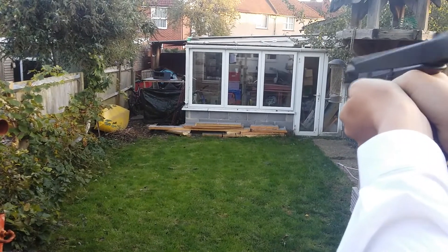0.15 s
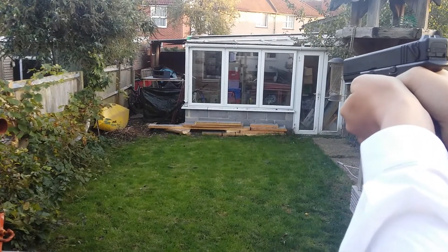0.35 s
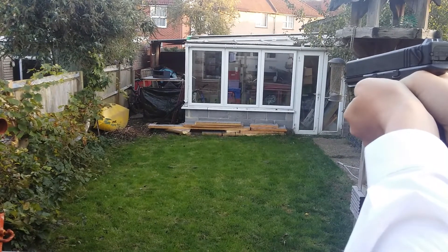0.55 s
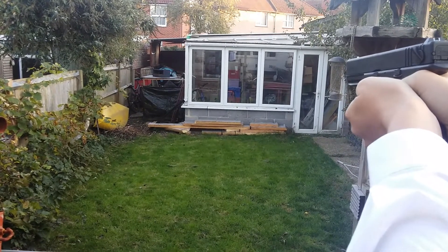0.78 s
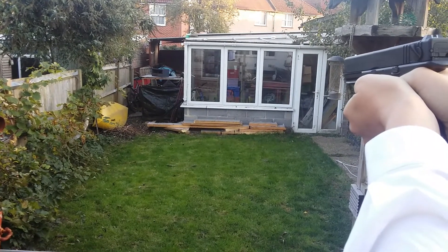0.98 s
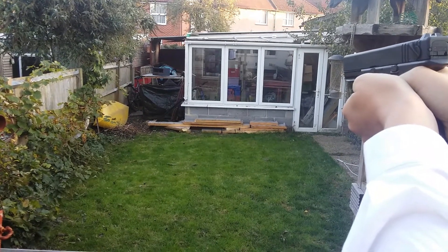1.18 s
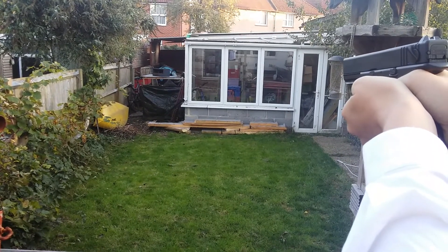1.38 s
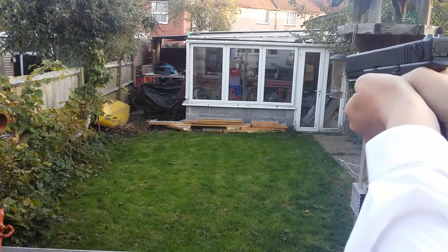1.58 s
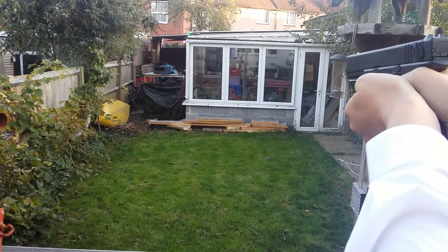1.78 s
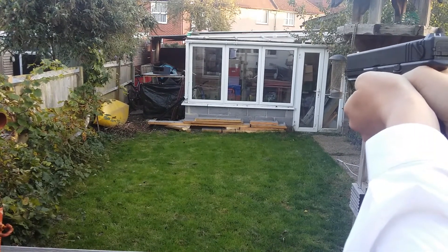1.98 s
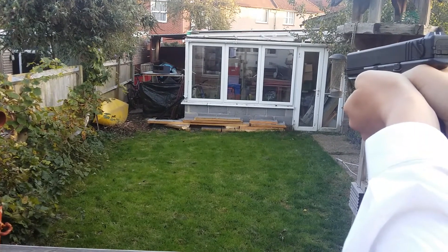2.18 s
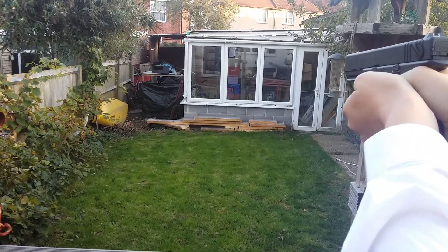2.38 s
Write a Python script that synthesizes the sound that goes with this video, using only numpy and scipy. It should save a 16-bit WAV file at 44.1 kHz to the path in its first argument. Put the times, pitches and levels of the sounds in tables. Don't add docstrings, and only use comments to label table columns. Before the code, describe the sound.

Close, dry pistol snaps with a brief gas hiss and slide rattle come three times, each answered a fifth of a second later by a bright board knock echoing off fences and houses, over very faint distant traffic.

```python
import sys
import numpy as np
from scipy import signal
from scipy.fft import rfft, irfft, next_fast_len
from scipy.io import wavfile
from scipy.ndimage import uniform_filter1d

SR = 44100
rng = np.random.default_rng(int(sys.argv[2]) if len(sys.argv) > 2 else 0)


def ratio_of_db(decibels):
    return 10 ** (np.asarray(decibels, float) / 20)


def persist_wave(psi):
    counts = np.round(np.clip(psi, -1, 1) * 32767).astype(np.int16)
    wavfile.write(sys.argv[1], SR, np.atleast_2d(counts).T)


N = 108045

# t/s, peak level/dB
CRACKS = [
    (.2088, -11.5),
    (1.1268, -10.5),
    (1.9558, -10.5),
]
# t/s, peak level/dB
POPS = [
    (0.2203, -10.3),
    (1.1393, -10.5),
    (1.9697, -12.5),
]
# f/Hz, density/dB per Hz
GAS_COLOUR = [(47, -46.5), (80, -9.5), (493, -2), (1280, -12), (1460, -2), (1900, -11.5), (4830, -12),
              (5520, -23), (16000, -38.5)]
# f/Hz, density/dB per Hz
SNAP_COLOUR = [(300, -29.5), (2000, -7.5), (5000, 2), (7000, -8.5), (16000, -10)]
# f/Hz, density/dB per Hz
RATTLE_COLOUR = [(120, -33), (200, -18), (623, -10), (1480, 2.5), (2020, -8.5), (3250, 5), (4950, -3),
                 (5630, -26), (9000, -25.5), (16000, -35.5)]
# t/s, scrape level/dB, ring f/Hz, ring level/dB, scrape length/s
CLANKS = [(0.231, -23, 4900, -26, 0.0012), (0.2497, -27.5, 2380, -30, .001),
          (0.2525, -27, 4900, -21.5, 0.00075), (0.2553, -33, 2700, -35, .004),
          (0.26, -23.5, 3300, -18.5, 0.0021), (0.2957, -36, 4900, -39.5, 0.0008),
          (.2972, -40.5, 1410, -33, 0.00058), (1.1495, -24.5, 3480, -19.5, 0.0039),
          (1.1726, -28.5, 4170, -30.5, 0.0051), (1.1812, -28.5, 1600, -26, 0.00198),
          (1.1832, -24, 3250, -21, 0.0025), (1.189, -31, 2700, -27, .003),
          (1.206, -35.5, 1624, -30.5, 0.0016), (1.9811, -26.5, 3510, -12.5, 0.0025),
          (1.9914, -35, 3450, -25, 0.0031), (2.0077, -32.5, 2480, -31, 0.0017),
          (2.0175, -34, 1610, -31.5, 0.0074), (2.0121, -27, 5190, -29, 0.0017),
          (2.0181, -25.5, 3200, -30, 0.0051), (2.042, -36, 4710, -35.5, 0.00079),
          (2.0437, -42, 1514, -29, 0.00086)]
# f/Hz, width/Hz, level/dB
SLIDE_MODES = [(1500, 610, -3), (2700, 420, -2.5), (3300, 400, 1), (4900, 1700, -10), (8260, 2200, -17)]
# f/Hz, t60/s
RING_T60 = [(1400, .014), (3250, .02), (3430, .045), (3600, .02), (4900, .013)]
# t/s, level/dB, t60/s, snap level/dB, pitch f/Hz
TICKS = [
    (0.1726, -60, 0.015, -78.5, 2510),
    (0.9861, -64.5, 0.22, -63.5, 1390),
    (1.0928, -58.5, 0.013, -73.5, 2400),
    (1.1005, -66.5, .012, -85.5, 4300),
    (1.928, -60.5, 0.019, -71.5, 2400),
    (1.936, -63, 0.013, -85, 4300),
    (2.407, -63.5, 0.23, -76, 4200),
]
# f/Hz, density/dB per Hz
TICK_COLOUR = [(290, -28.5), (500, 0.5), (3250, -7.5), (4210, -8.5), (6510, -35), (12700, -29),
               (16000, -33.5)]
# t/s, peak level/dB, low board pitch f/Hz, high board pitch f/Hz, contact/ms
IMPACTS = [
    (0.4134, -9, 990, 1560, 0.059),
    (1.3371, -11.5, 1190, 1666, 0.092),
    (2.174, -12.5, 985, 1395, 0.098),
]
# f/Hz, width/Hz, level/dB
BOARD_MODES = [(165.2, 70, -2.5), (2800, 910, 1), (4233, 430, -2), (8000, 6000, -24.5)]
# f/Hz, density/dB per Hz
SHAKE_COLOUR = [(47, -65.5), (80, -35.5), (133, -6.5), (550, -15.5), (734, -3), (1490, 4), (1860, -3.5),
                (4520, -3.5), (16000, -78.5)]
# delay/s, sign, left level/dB, right level/dB
WALLS = [(.0020, -1, -6, -4), (.0056, -1, -9, -10), (.0077, 1, -10, -11), (.0136, 1, -10, -10),
         (.0165, -1, -13, -12), (.0182, 1, -13, -12), (.027, 1, -18, -17)]
# f/Hz, density/dB per Hz
SLIDE_WET = [(120, -31), (600, -12), (1500, -3.5), (3300, -4), (5000, -5.5), (5800, -12.5), (9000, -21.5),
             (16000, -28.5)]
# f/Hz, density/dB per Hz
BOARD_WET = [(60, -32), (160, -5.5), (550, -4.5), (1200, -1), (3400, 0.5), (4900, -7), (6000, -18.5),
             (8500, -21.5), (16000, -43.5)]
# f/Hz, t60/s
GARDEN = [(150, .31), (1000, .26), (4000, .27), (7000, 0.27), (10000, .22), (14000, 0.18)]
# f/Hz, t60/s
STREET = [(200, 1.5), (1500, 0.75), (3500, .8), (5500, 0.38), (12000, 0.35)]
# f/Hz, density/dB per Hz
HUM = [(15, -39), (30, -15.5), (95, -3.5), (250, -8.5), (500, -16), (1000, -21.5), (1500, -29.5),
       (2200, -41.5), (4900, -56), (7000, -50), (16500, -51.5)]
# f/Hz, likeness/1
ALIKE = [(60, 0.67), (240, 0.12), (950, 0.37), (3770, 0.23), (15000, 0.2)]
# t/s, level/dB
SWELL = [(0, -2.5), (.7, -3.5), (1.301, 1), (1.799, -1), (2.45, -1)]
# t/s, level/dB
WHINE = [(1.501, -100), (1.65, -79.5), (1.819, -78), (1.93, -79.5), (2.201, -105)]
# f/Hz, left over right level/dB
PORTS = [(60, -2.5), (300, -3), (700, -.5), (1500, -1.5), (3600, -1), (4900, 15), (6500, 6), (12000, -1)]
# f/Hz, level/dB
MIC = [(15, -13), (40, -1), (80, 0), (15700, 0), (16000, -18), (16800, -24), (17000, -80)]

LEAD_S = .004
VALVE_S, VALVE_DB, VALVE_MS = 0.0024, -15, 0.22
POP_MS, REBOUND, REBOUND_S = 0.33, .45, .0012
LEAK_S = .0045
SNAP_DB, SNAP_T60 = -11.5, .004
RATTLE_DB, FADE_T60, SCRAPE_T60, RING_RISE_S = -2, 0.041, .01, 0.00048
SLIDE_SEND_DB, BOARD_SEND_DB = 20.5, 8.5
TICK_RING, TICK_WIDTH = 0.83, 0.2
BOARD_WIDTH_HZ, LOW_DB, HIGH_DB = 330, -1, 6.5
SHAKE_DB, SHAKE_T60 = -34, 0.029
GRIT, GRIT_HZ = 0.095, 6710
WET_RING = .7
WALL_HZ = 5500
BASS_HZ = 485
HUM_DB, WHINE_HZ = -65.5, 1510


def gas():
    out = np.zeros((2, N))
    for (s, db), (pop_s, pop_db) in zip(CRACKS, POPS):
        hiss = burst(GAS_COLOUR, rise_s=0.0026, hold_s=0.016, t60=0.08, alike=0.41)
        add(out, s - LEAK_S, ratio_of_db(-26.5) * hiss)
        add(out, s - LEAD_S, -ratio_of_db(db) * push(width_ms=.072))
        add(out, s - LEAD_S + .0002, ratio_of_db(db) * push(width_ms=.072))
        add(out, s - .0002, ratio_of_db(db + SNAP_DB) * burst(SNAP_COLOUR, .00005, .0005, SNAP_T60, alike=.05))
        add(out, s - LEAD_S + .0011, -ratio_of_db(db - 4) * push(width_ms=.07))
        add(out, s, ratio_of_db(db - 11) * burst(RATTLE_COLOUR, .0001, .001, .012, alike=.4))
        valve_s = s + VALVE_S - LEAD_S
        add(out, valve_s, -ratio_of_db(VALVE_DB) * push(VALVE_MS))
        add(out, valve_s + 0.0012, ratio_of_db(VALVE_DB - 10.5) * push(5.2 * VALVE_MS))
        add(out, pop_s - LEAD_S, ratio_of_db(pop_db) * push(POP_MS))
        add(out, pop_s + REBOUND_S - LEAD_S, -REBOUND * ratio_of_db(pop_db) * push(2.01 * POP_MS))
    low_modes = body([(163, 27, 2), (277, 60, -13), (410, 95, -13.5)])
    return out + filtered(out, low_modes)


def slide():
    out, sent = np.zeros((2, 2, N))
    t = np.arange(SR // 4) / SR
    for s, db, hz, ring_db, scrape_s in CLANKS:
        after = np.maximum(t - scrape_s, 0)
        metal = unit(filtered(pair(len(t), alike=0.81), body(SLIDE_MODES))) * ratio_of_db(-60 * after / SCRAPE_T60)
        rattle = burst(RATTLE_COLOUR, 0.000067, scrape_s, FADE_T60, alike=0.32)
        add(out, s, ratio_of_db(db) * (metal + ratio_of_db(RATTLE_DB) * rattle))
        phase = 2 * np.pi * (hz * t + rng.random((2, 1)) / 4)
        ping = np.sin(phase) * (1 - np.exp(-t / RING_RISE_S))
        add(out, s, ratio_of_db(ring_db - 60 * after / along(RING_T60, hz)) * ping)
        add(sent, s, ratio_of_db(db + SLIDE_SEND_DB) * np.sqrt(1 + scrape_s / .003) * click(SLIDE_WET))
    for s, db, t60, snap_db, hz in TICKS:
        add(out, s, ratio_of_db(snap_db) * burst(SNAP_COLOUR, .0001, 0.0005, 2 * SNAP_T60, alike=0.36))
        pitch = body([(hz, TICK_WIDTH * hz, 0)])
        tick = burst(TICK_COLOUR, .0001, 0.0014, t60, alike=0.18)
        add(out, s, ratio_of_db(db) * filtered(tick, lambda f: 1 + TICK_RING * pitch(f)))
    return out, sent


def pellet():
    out, sent = np.zeros((2, 2, N))
    t = np.arange(SR // 8) / SR
    for s, db, low_hz, high_hz, contact_ms in IMPACTS:
        def contact(f):
            smooth = np.exp(-.5 * (2 * np.pi * f * contact_ms / 1000) ** 2)
            return smooth + GRIT * .05 / contact_ms / (1 + (f / GRIT_HZ) ** 4)

        def wet(f):
            pitches = body([(low_hz, 400, 0), (high_hz, 400, 0)], flip=1)
            return (1 + WET_RING * pitches(f)) / (1 + 1j * f * contact_ms / 300) ** 2

        own_modes = [(low_hz, BOARD_WIDTH_HZ, LOW_DB), (high_hz, BOARD_WIDTH_HZ, HIGH_DB)]
        board = body(BOARD_MODES + own_modes, flip=0.93)
        impulse = 1. * (t == t[9])
        knock = filtered(impulse, lambda f: contact(f) * board(f) * 1j * f / (1j * f + 130))
        knock *= ratio_of_db(db) / np.abs(knock).max()
        add(out, s - t[9], knock * ratio_of_db([[0], [-2]]))
        add(out, s, ratio_of_db(db - 63) * burst(SNAP_COLOUR, .0001, .002, .15, alike=.3))
        dull = filtered(knock, lambda f: 1 / (1 + 1j * f / WALL_HZ) ** 2)
        for delay_s, sign, *side_db in WALLS:
            for ear in range(2):
                arrival_s = s + delay_s + rng.normal(0, 0.0001)
                add(out[ear], arrival_s, sign * ratio_of_db(side_db[ear]) * dull)
        shake = burst(SHAKE_COLOUR, .0008, .006, SHAKE_T60, alike=.35)
        add(out, s, ratio_of_db(db + 18.5 + SHAKE_DB) * filtered(shake, lambda f: contact(.6 * f)))
        add(sent, s, ratio_of_db(db + BOARD_SEND_DB) * filtered(click(BOARD_WET), wet))
    return out, sent


def echo(x, street_db, gap_s):
    out, step = np.zeros((2, N)), SR // 40
    for k in range(0, N, step):
        piece = x[:, k:k + step]
        if np.abs(piece).max() > 1e-4:
            hz, t, z = signal.stft(pair(SR * 2 // 3, alike=0.13), SR, nperseg=256)
            near = ratio_of_db(-60 * t / along(GARDEN, hz)[:, None])
            far = ratio_of_db(street_db - 60 * t / along(STREET, hz)[:, None]) * (1 - np.exp(-t / .02))
            tail = signal.istft(z * np.hypot(near, far), SR, nperseg=256)[1]
            tail = tail / np.linalg.norm(tail[0])
            add(out, k / SR + gap_s, signal.fftconvolve(piece, tail, axes=1))
    return out


def traffic():
    z = signal.stft(rng.standard_normal((2, N + 512)), nperseg=1024)[2]
    patches = uniform_filter1d(rng.standard_normal(z.shape[1:]), size=8, axis=0)
    patches = uniform_filter1d(patches, size=5, axis=1)
    two = signal.istft(z * ratio_of_db(0.5 * unit(patches)), nperseg=1024)[1][:, :N]

    def mid_side(hz):
        turn = np.arccos(np.clip(along(ALIKE, hz), -1, 1)) / 2
        return ratio_of_db(along(HUM, hz)) * [np.cos(turn), np.sin(turn)]

    mid, side = filtered(two, mid_side)
    hum = unit(np.array([mid + side, mid - side]))
    whine = unit(filtered(rng.standard_normal((2, N)), body([(WHINE_HZ, 70, 0)])))
    t = np.arange(N) / SR
    swell_db = np.interp(t, *np.transpose(SWELL))
    whine_db = np.interp(t, *np.transpose(WHINE))
    return ratio_of_db(HUM_DB + 1.0 + swell_db) * hum + ratio_of_db(whine_db) * whine


def push(width_ms):
    u = (np.arange(SR // 50) / SR - LEAD_S) * 1000 / width_ms
    return (1 - u * u) * np.exp(-u * u / 2)


def burst(spectrum, rise_s, hold_s, t60, alike):
    t = np.arange(SR // 4) / SR
    noise = unit(filtered(pair(len(t), alike), causal(spectrum)))
    return noise * (1 - np.exp(-t / rise_s)) ** 2 * ratio_of_db(-60 * np.maximum(t - hold_s, 0) / t60)


def click(spectrum):
    x = filtered(1. * (np.arange(SR // 50) == 0), causal(spectrum))
    return x / np.linalg.norm(x)


def pair(count, alike):
    a = rng.standard_normal((3, count))

    def share(hz):
        return 1 - (1 - np.clip(alike, 0, 1)) * hz ** 2 / (hz ** 2 + BASS_HZ ** 2)

    common = filtered(a[0], lambda hz: np.sqrt(share(hz)))
    return common + filtered(a[1:], lambda hz: np.sqrt(1 - share(hz)))


def body(peaks, flip=-1):
    def response(f):
        total = 0
        for k, (c, w, db) in enumerate(peaks):
            total = total + flip ** k * ratio_of_db(db) * 1j * f * w / (c * c - f * f + 1j * f * w)
        return total
    return response


def causal(points, share=1):
    def response(hz):
        c = irfft(share * np.maximum(along(points, hz), -100) * np.log(10) / 20)
        c[1:len(c) // 2] *= 2
        c[len(c) // 2 + 1:] = 0
        return np.exp(rfft(c, 2 * len(hz) - 2))
    return response


def filtered(x, response):
    n = x.shape[-1]
    m = 2 * next_fast_len(n // 2 + 2048, True)
    return irfft(rfft(x, m) * response(np.fft.rfftfreq(m, 1 / SR)), m)[..., :n]


def along(points, hz):
    f, v = np.transpose(points)
    return np.interp(np.log(hz + 1), np.log(f + 1), v)


def unit(x):
    return x / np.sqrt(np.mean(x ** 2) + 1e-20)


def add(out, s, x):
    part = out[..., round(s * SR):]
    part[..., :x.shape[-1]] += x[..., :part.shape[-1]]


def scene():
    blast = gas()
    metal, metal_sent = slide()
    board, board_sent = pellet()
    near_wet = ratio_of_db(-12.5) * echo(blast + metal_sent, street_db=-29.5, gap_s=.006)
    far_wet = echo(board_sent, street_db=-21.5, gap_s=0.0074)
    return blast + metal + board + near_wet + far_wet + traffic()


def low_pass(x):
    return signal.sosfilt(signal.butter(12, 16870, fs=SR, output="sos"), x)


def record(dry):
    def late(hz):
        delay = np.exp(-2j * np.pi * hz * .00006 / (1 + (hz / 7000) ** 2))
        return delay * (1j * hz + 5) / (1j * hz + 40)

    right_colour = causal(PORTS, share=-.4)
    left = filtered(dry[0], causal(PORTS, share=.6))
    right = filtered(dry[1], lambda hz: right_colour(hz) * late(hz))
    return low_pass(filtered(np.array([left, right]), causal(MIC)))


dry = scene()
out = record(dry)
persist_wave(out)
```